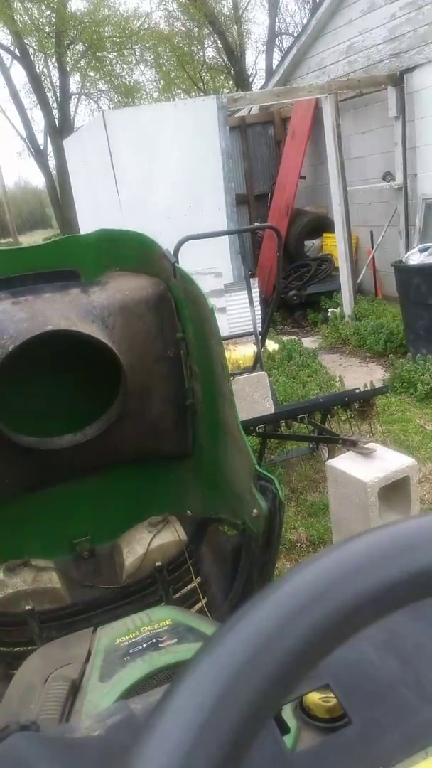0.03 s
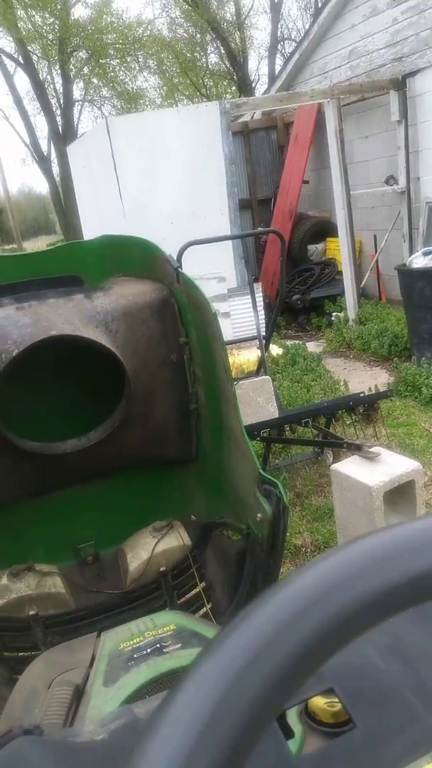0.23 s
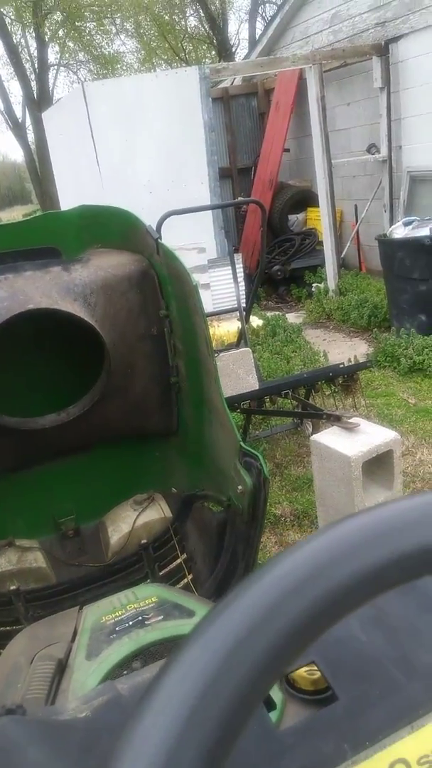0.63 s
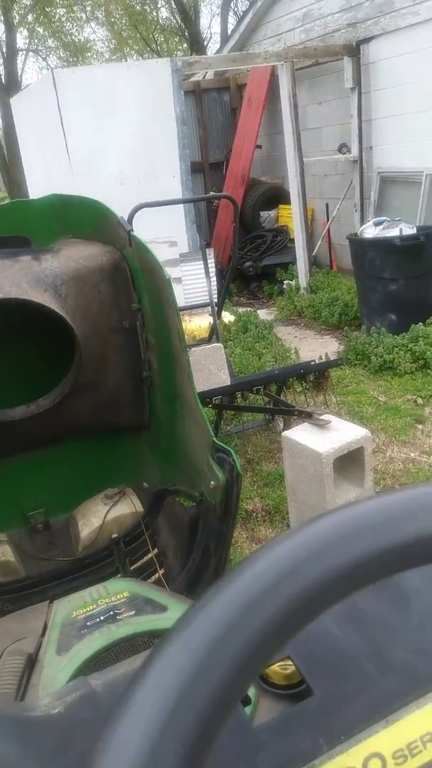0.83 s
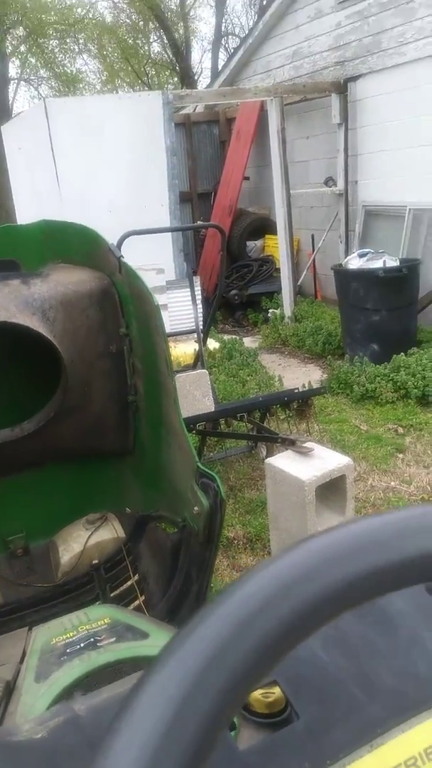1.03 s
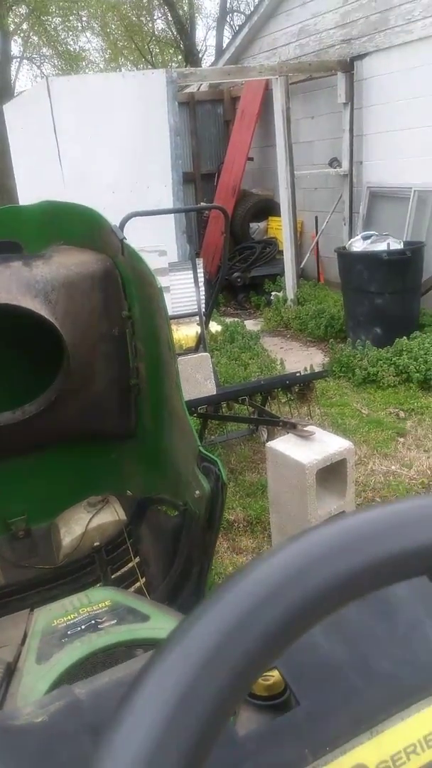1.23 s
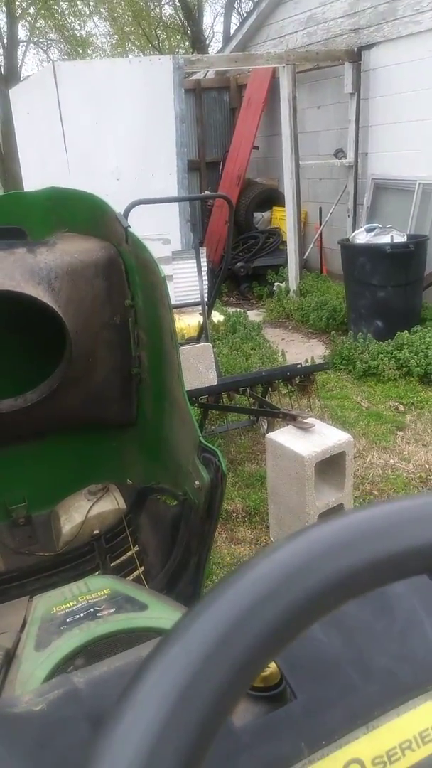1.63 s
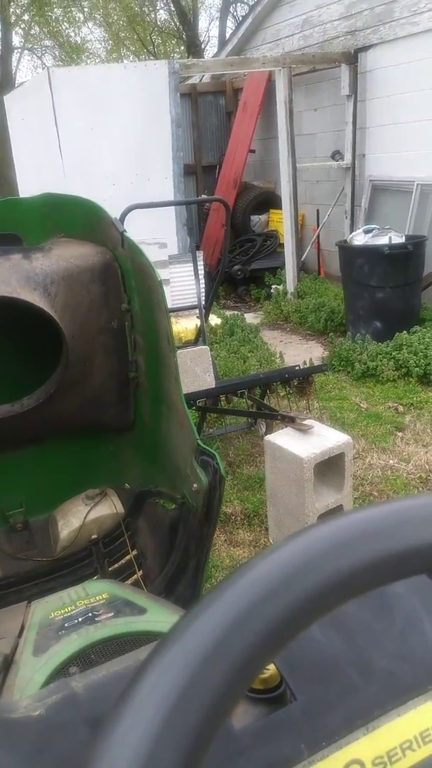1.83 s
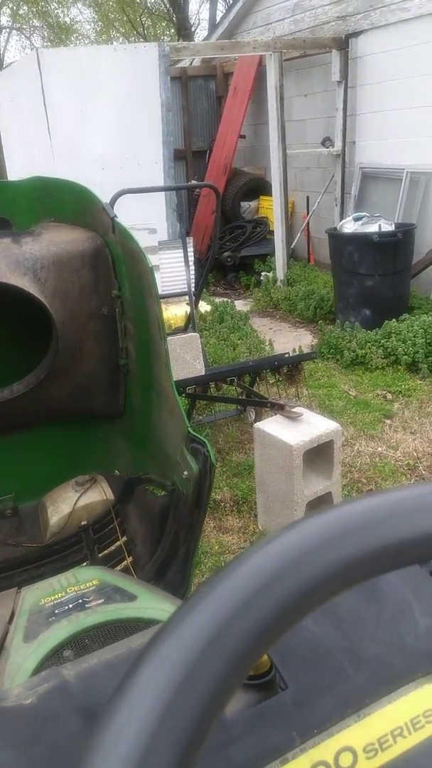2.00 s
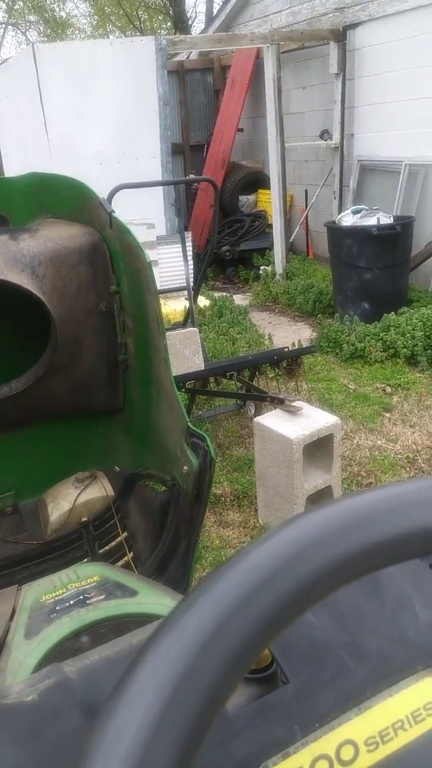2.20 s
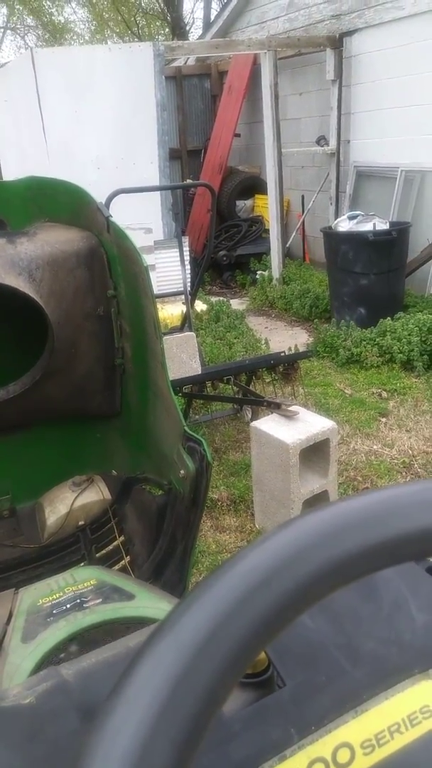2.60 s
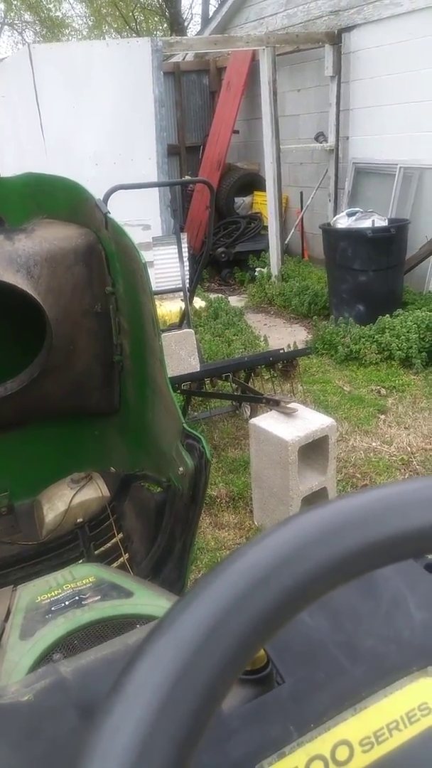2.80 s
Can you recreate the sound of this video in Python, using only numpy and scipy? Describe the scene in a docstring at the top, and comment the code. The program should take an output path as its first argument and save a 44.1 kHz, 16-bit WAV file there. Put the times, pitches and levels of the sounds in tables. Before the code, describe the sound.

A riding mower's metal hood is rocked close to the microphone in a yard. Its hinge clanks, scrapes and squeals, then clanks again with a shorter, higher squeal. Dull thuds follow, over a faint outdoor rumble.

```python
"""The open hood of a riding mower is rocked about close to the microphone, in a yard, engine off.
First the hinge clanks, scrapes in stick-slip strokes and gives a long squeal; the panel rings with
each clank and stroke. At 1 s come more clanks, a short, higher squeal and a run of scrapes. From 1.7 s
dull thuds crowd in close by; the loudest, near 2.3 s, clips. Last clanks near 2.6 s and a few softer
thuds end the scene. A faint outdoor rumble lies under it throughout."""
import sys
import numpy as np
from scipy import signal
from scipy.fft import rfft, irfft, next_fast_len
from scipy.io import wavfile
from scipy.ndimage import uniform_filter1d

SR = 44100
rng = np.random.default_rng(int(sys.argv[2]) if len(sys.argv) > 2 else 0)


def transcribe(signal):
    """Save signal, clipped to [-1, 1], as a 16-bit WAV file at the path in sys.argv[1]."""
    frames = np.atleast_2d(signal).T
    limited = np.clip(frames, -1, 1)
    pcm = np.round(limited * 32767).astype(np.int16)
    wavfile.write(sys.argv[1], SR, pcm)


N = 130095

# Impacts in the hinge: t/s, relative level/dB, bass gain/dB, treble tilt/(dB per octave)
CLANKS = [(.101, -12, -19, 0.5), (.120, -10, -5.5, 1.5), (1.012, -11.5, -14, .5), (1.026, -17.5, -2.5, -1),
          (1.5255, -12.5, -13.5, 0), (.554, -19, -26, -7), (2.5545, -10, -16, 0.5), (2.573, -9.5, -7.5, .5),
          (.586, -27, -3, 1.5), (.69, -38, -9, 0.5), (.756, -38.5, 2, -0.5), (2.651, -20.5, -1.5, -5.5)]
# Friction strokes: peak t/s, rise/s, fall/s, relative level/dB, bass gain/dB, treble tilt/(dB per octave)
SCRAPES = [(.15, 0.016, 0.027, -24, 4, -2), (.185, 0.019, 0.038, -21, -6.5, -1),
           (.22, 0.011, 0.015, -24.5, 5.5, -3.5), (.295, 0.029, .035, -22, -3.5, -5),
           (.592, 0.013, 0.029, -29, 2.5, -2), (.652, .01, 0.015, -35.5, -2, -2.5),
           (.692, 0.017, 0.029, -30, -17.5, -3.5), (.765, 0.015, 0.013, -36, 3, -4),
           (.97, 0.073, 0.063, -46, -39, -1), (1.04, .01, 0.024, -31, 12.5, -0.5),
           (1.09, 0.021, 0.017, -17.5, -2.5, -2.5), (1.12, 0.007, 0.013, -24, 4, -3),
           (1.188, 0.018, 0.026, -21.5, -2.5, -1.5), (1.238, 0.017, 0.0098, -23, -1.5, 0),
           (1.265, 0.011, 0.016, -26, -11, -2.5), (1.36, 0.02, 0.027, -29.5, -7.5, 1),
           (1.405, 0.014, 0.017, -30, -7, -5), (1.46, 0.019, 0.029, -31, -4, -0.5),
           (1.57, 0.031, 0.03, -24, -6.5, -11), (1.625, 0.038, 0.026, -19, -4.5, 0),
           (1.672, 0.027, 0.019, -18.5, 2, 0.5), (1.70, 0.012, .016, -15.5, -5.5, -6),
           (1.76, 0.017, 0.013, -34, 17.5, -2.5), (2.06, 0.022, 0.016, -33.5, 9.5, -21.5),
           (2.095, 0.019, 0.024, -20.5, -1, 2), (2.145, 0.022, 0.025, -23, -16, -1),
           (2.18, 0.021, 0.023, -21, -4.5, -1), (2.232, .01, 0.023, -27, -6.5, 0.5),
           (2.278, 0.017, 0.058, -36, 8.5, 0.5), (2.405, 0.028, 0.017, -36, -3.5, 0),
           (2.49, 0.045, 0.04, -44, 11.5, -4), (2.593, .01, 0.016, -15, -3.5, -24),
           (2.623, 0.014, 0.021, -26.5, 5.5, 0), (2.655, 0.025, 0.025, -20, -0.5, -2.5),
           (2.71, 0.039, 0.024, -36.5, 15.5, -23), (2.82, 0.055, .08, -55, 7.5, -25)]
# Modes of the hood panel: f/Hz, relative level/dB, T60/s
PANEL_MODES = [(332.6, -6.5, 0.15), (377.3, -5.5, 0.14), (468, 1.5, 0.44), (541.4, -0.5, 0.21),
               (651, 0, 0.32), (736, -4, 0.36), (793, 1, 0.54), (885, 3.5, 0.54), (977, 4.5, 0.34),
               (1102, 0.5, .3), (1268, -1, .3), (1545, -1.5, 0.23), (1680, -4, 0.64), (3060, -14, .4)]
# Spectral envelope of the hood: f/Hz, relative level/dB
HOOD_SPECTRUM = [(53, -56), (90, -47.5), (119, -50.5), (237, -12.5), (342, -2.5), (415, -5), (453, -10),
                 (626, -8), (697, -3), (776, -7), (983, -5), (1070, -8), (1360, -6.5), (1650, -5.5),
                 (2050, -16.5), (2590, -21), (3360, -20.5), (3740, -28), (5060, -28), (6270, -37),
                 (7140, -43), (8480, -41.5), (9650, -48), (12200, -55.5), (15500, -65)]
# Course of each squeal: t/s, slip rate f/Hz, level/dB
LONG_SQUEAL = [(.15, 868, -34), (0.211, 864.4, -29.5), (.25, 833, -30.5), (.28, 830, -30),
               (0.346, 837, -30.5), (.44, 843, -29.5), (.472, 842.5, -28.5), (0.485, 843, -33),
               (0.499, 855, -26), (.55, 854, -28), (.578, 846.6, -31), (.605, 852, -37)]
SHORT_SQUEAL = [(1.05, 1085, -53), (1.08, 1070, -45), (1.125, 1062, -46), (1.145, 1085, -43),
                (1.175, 1035, -39), (1.20, 1030, -60)]
# Harmonics of each squeal, from the fundamental up: relative level/dB
LONG_HARMONICS = [-20, -0.5, -26.5, -27, -25.5, -30, -40.5, -28.5, -29.5, -32.5, -43, -49.5, -53, -52, -59,
                  -57, -56, -55]
SHORT_HARMONICS = [-1, -1, -7.5, -17, -25, -13.5, -18, -19, -29, -32, -35, -36]
# Resonances caught by the slip: t/s, f/Hz, level/dB, decay time/s
GROANS = [(0.577, 1625, -26.5, 0.042), (1.157, 652, -23, .014), (1.19, 4560, -31.5, 0.0093),
          (2.425, 4950, -65, .08), (1.692, 891.7, -18, 0.014), (2.159, 990, -14.5, 0.014),
          (2.163, 1590, -20, 0.03), (2.164, 1533, -24.5, 0.032), (2.648, 706, -15.5, 0.013)]
# Dull blows: t/s, peak level/dB, f/Hz
THUDS = [(.468, -20, 400), (1.743, -12, 450), (1.774, -16.5, 525), (1.798, -9.5, 480), (1.865, -12, 520),
         (1.886, -28, 520), (1.918, -13.5, 620), (1.998, -20.5, 406), (2.326, -19, 400), (2.334, -9.5, 430),
         (2.3417, -1, 446), (2.3445, -6, 490), (2.357, -24, 333), (2.806, -16.5, 460), (2.853, -22.5, 400),
         (2.868, -20, 390)]
# Runs of soft bumps: t/s, duration/s, level/dB
FLURRIES = [(0.019, .012, -52), (.392, .02, -37), (0.751, .025, -41), (1.751, .02, -27.5),
            (1.823, .034, -29.5), (1.889, .01, -34), (1.921, .012, -31), (1.94, .019, -29),
            (1.966, .008, -35.5), (2.004, .018, -30.5), (2.278, .02, -37), (2.348, .016, -27),
            (2.774, .024, -30.5), (2.877, .02, -35), (2.896, .018, -38)]
# Spectral envelopes of the bumps and of the outdoor air: f/Hz, relative level/dB
FLURRY_SPECTRUM = [(100, -42.5), (190, -9.5), (300, -1), (480, -0.5), (900, -14.5), (1300, -29.5),
                   (2500, -66), (10000, -90)]
YARD_SPECTRUM = [(30, -48.5), (100, -31), (200, -5), (330, -1.5), (900, -8), (1650, -2), (2100, -31),
                 (2800, -22.5), (3700, -35), (4500, -34.5), (7000, -51.5), (15000, -46)]


def hinge(t, clank_gain_db=8, clank_rise_s=0.0019, clank_decay_s=0.0076, window_s=0.25):
    """Impact and stick-slip friction: sudden clanks and swelling scrapes exert a force on the hood."""
    grit = impacts(per_s=2200, scatter_db=3.5) * undb(2.1 * wander(160))
    chatter = impacts(per_s=9000, scatter_db=2)
    age = t[:int(window_s * SR)] - window_s / 2  # zero at the event's time
    shift = lambda x, k: np.roll(x, -k * SR // 13)[:len(age)]  # shifted along for each event
    since = np.maximum(age, 0)
    blow = (1 - np.exp(-since / clank_rise_s)) * np.exp(-since / clank_decay_s)
    force = np.zeros(N)
    for k, (at, db, bass_db, tilt) in enumerate(CLANKS):
        clank = shift(chatter, k) * undb(db + clank_gain_db) * blow
        force += contact(clank, at + age[0], bass_db, tilt)
    for k, (at, rise, fall, db, bass_db, tilt) in enumerate(SCRAPES):
        swell = np.exp(-np.abs(age / np.where(age < 0, rise, fall)) ** 1.7)
        force += contact(shift(grit, k) * undb(db) * swell, at + age[0], bass_db, tilt)
    return force


def contact(force, at, bass_db, tilt, bass_hz=556, treble_hz=1640, rattle_t60_s=0.041, tick=0.59):
    """Convolution: a contact spreads its force into a tick and a rattle, with its own bass and treble."""
    size = next_fast_len(len(force))
    f = np.fft.rfftfreq(size, 1 / SR)
    shelf_db = bass_db / (1 + (f / bass_hz) ** 4)
    treble_db = tilt * np.log2(1 + (f / treble_hz) ** 4) / 4
    rattle = rng.standard_normal(size) * fade(np.arange(size) / SR, rattle_t60_s)
    transfer = (rfft(unit_energy(rattle)) + tick) / np.hypot(1, tick) * undb(shelf_db + treble_db)
    out, start = np.zeros(N + 2 * SR), SR + int(at * SR)
    out[start:start + size] = irfft(rfft(force, size) * transfer, size)
    return out[SR:SR + N]


def hood(force, t, tail_t60_s=0.37, tail_top_hz=2410):
    """Modal superposition: the driven panel rings as a sum of damped sines with a dull, diffuse tail."""
    age = t[:SR]
    modes = sum(undb(db) * fade(age, t60) * np.sin(2 * np.pi * (hz * age + rng.random()))
                for hz, db, t60 in PANEL_MODES)
    tail = unit_energy(rng.standard_normal(SR) * fade(age, tail_t60_s))
    response = undb(-23.5) * unit_energy(modes) + undb(-7.5) * butter(tail, tail_top_hz, "low")
    response[0] += 1  # the force itself is heard too
    return colour(signal.fftconvolve(force, response)[:N], HOOD_SPECTRUM)


def squeal(t, course, harmonics_db, waver, flutter_db=1.5, edge_s=0.013):
    """Self-excited oscillation: periodic stick-slip in the dry hinge gives a harmonic series."""
    at, hz, db = np.array(course).T
    slip_hz = np.interp(t, at, hz) * (1 + waver * wander(300))
    phase = 2 * np.pi * np.cumsum(slip_hz) / SR
    gate = np.clip(np.minimum(t - at[0], at[-1] - t) / edge_s, 0, 1)
    tone = np.zeros(N)
    for k, harmonic_db in enumerate(harmonics_db):
        flutter = flutter_db * min(k / 6, 2) * wander(24.6)  # upper harmonics flutter more
        tone += undb(harmonic_db + flutter) * np.sin((k + 1) * phase)
    return np.sqrt(2) * gate * undb(np.interp(t, at, db)) * tone


def groans(t, rise_s=0.0085, waver=0.012):
    """Mode lock-in: the slip briefly follows one resonance, whose tone builds and then rings out."""
    out = np.zeros(N)
    for at, hz, db, decay in GROANS:
        age = np.maximum(t - at, 0)
        swell = np.minimum(age / rise_s, 1) * np.exp(-np.maximum(age - rise_s, 0) / decay)
        phase = 2 * np.pi * np.cumsum(hz * (1 + waver * wander(200))) / SR
        out += np.sqrt(2) * undb(db) * swell * np.sin(phase)
    return out


def thuds(t, q=1.66, patter_per_s=250, patter_db=-17, patter_decay_s=0.022):
    """Damped resonance: a soft blow and a patter of aftershocks excite a heavily damped part."""
    out, size = np.zeros(N + SR), SR // 8
    for at, db, hz in THUDS:
        patter = (rng.random(size) < patter_per_s / SR) * rng.standard_normal(size)
        push = patter * undb(patter_db) * np.exp(-t[:size] / patter_decay_s)
        push[0] = 1  # the blow
        ring = signal.lfilter(*signal.iirpeak(hz, q, fs=SR), push)
        ring = butter(ring, 1.95 * hz, "low", order=5)
        ring = butter(ring, 233, "high", order=3)
        start = int(at * SR)
        out[start:start + size] += undb(db) * ring / np.abs(ring).max()
    return out[:N]


def flurries(t, bumps_per_s=900, edge_s=0.0041):
    """Shot noise: small random bumps merge into short, dull runs."""
    gate = sum(undb(db) * np.clip(np.minimum(t - at, at + length - t) / edge_s + 0.5, 0, 1)
               for at, length, db in FLURRIES)
    return colour(gate * impacts(bumps_per_s, scatter_db=2), FLURRY_SPECTRUM)


def yard(level_db=-51.5):
    """Amplitude-modulated noise: the outdoor air rumbles faintly and unevenly."""
    return undb(level_db + 2 * wander(12)) * colour(rng.standard_normal(N), YARD_SPECTRUM)


def impacts(per_s, scatter_db):
    """Poisson process: irregular tiny impacts of log-normal size, rms 1."""
    hits = (rng.random(N) < per_s / SR) * rng.choice([-1, 1], N)
    return unit_rms(hits * undb(scatter_db * rng.standard_normal(N)))


def wander(per_s):
    """Moving average: random steps are smoothed into a drift of rms 1."""
    hold = int(SR / per_s)
    steps = np.repeat(rng.standard_normal(N // hold + 1), hold)
    return unit_rms(uniform_filter1d(steps, hold)[:N])


def colour(x, spectrum, size=4096):
    """Minimum-phase filtering: imposes a spectral envelope and keeps the power of white noise."""
    hz, db = np.array(spectrum).T
    f = np.fft.rfftfreq(size, 1 / SR)
    gain = undb(np.interp(np.log(f + 1), np.log(hz), db))
    cepstrum = irfft(np.log(gain))
    cepstrum[1:size // 2] *= 2  # folding onto positive time makes the filter causal
    cepstrum[size // 2 + 1:] = 0
    response = irfft(np.exp(rfft(cepstrum)))
    return signal.fftconvolve(x, unit_energy(response))[:N]


def butter(x, hz, kind, order=2):
    """Butterworth filtering: causal, with a maximally flat passband."""
    return signal.sosfilt(signal.butter(order, hz, kind, fs=SR, output="sos"), x)


def fade(age, t60):
    """Exponential decay: 60 dB down after t60 seconds."""
    return np.exp(-np.log(1000) * age / t60)


def undb(db):
    """Decibel law: level to amplitude ratio."""
    return 10 ** (np.asarray(db) / 20)


def unit_rms(x):
    """Power normalisation: mean square 1."""
    return x / np.sqrt(np.mean(x ** 2))


def unit_energy(x):
    """Energy normalisation: sum of squares 1."""
    return x / np.linalg.norm(x)


def scene():
    """Linear superposition: the pressures of all sources add at one microphone."""
    t = np.arange(N) / SR
    squeals = squeal(t, LONG_SQUEAL, LONG_HARMONICS, waver=0.0018)
    squeals += squeal(t, SHORT_SQUEAL, SHORT_HARMONICS, waver=0.0057)
    return (hood(hinge(t), t) + squeals + groans(t) + thuds(t) + flurries(t) + yard())[None]


def record(dry, notch_q=25, clip_level=0.5, top_hz=15500):
    """Filtering and saturation: the microphone has narrow dips; the recorder clips and cuts the top."""
    for notch_hz in (3646, 7160, 9520):
        dry = signal.lfilter(*signal.iirnotch(notch_hz, notch_q, fs=SR), dry)
    clipped = np.clip(dry, -clip_level, clip_level)
    return signal.sosfilt(signal.ellip(10, 0.2, 80, top_hz, fs=SR, output="sos"), clipped)


dry = scene()
out = record(dry)
transcribe(out)
```